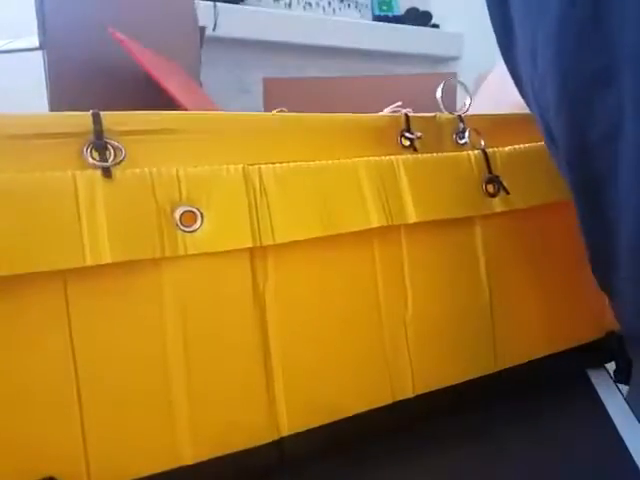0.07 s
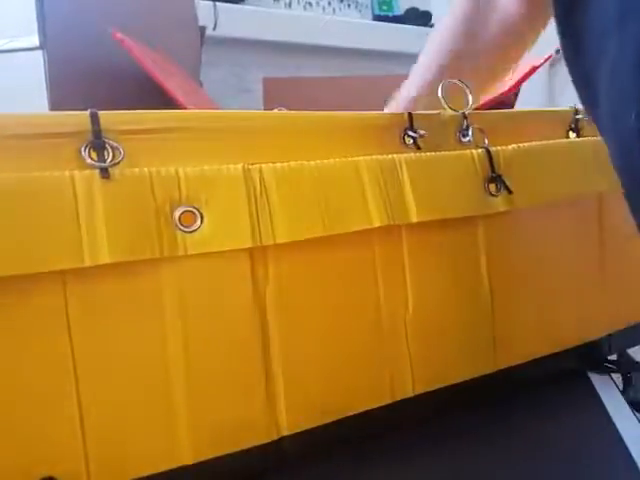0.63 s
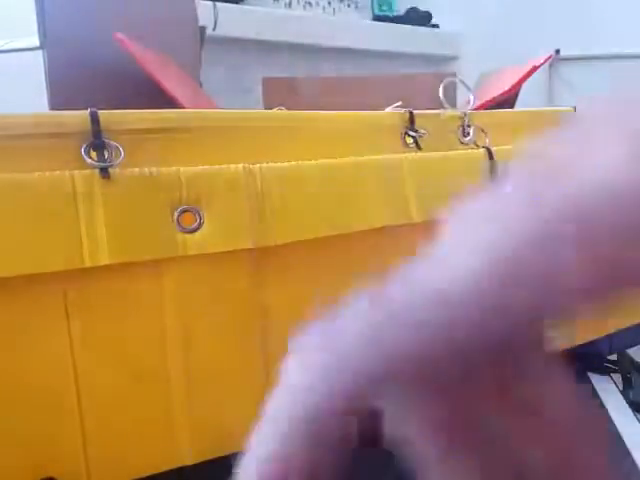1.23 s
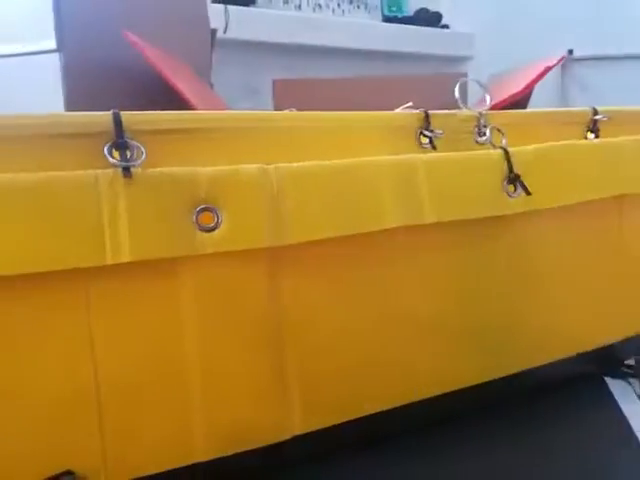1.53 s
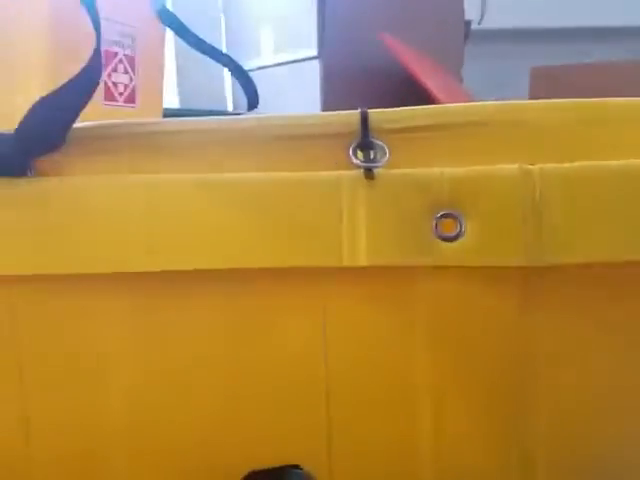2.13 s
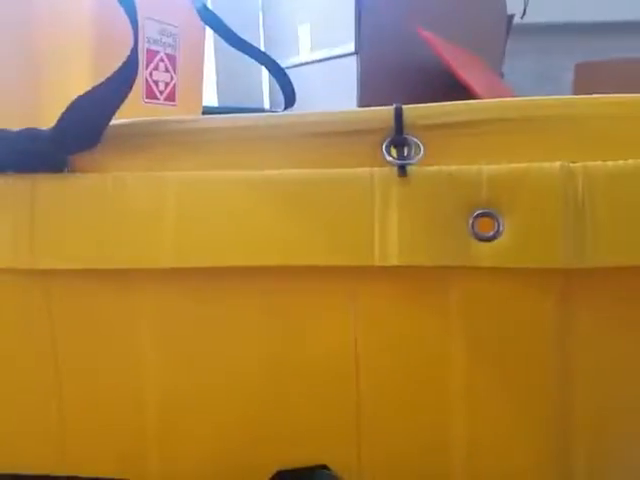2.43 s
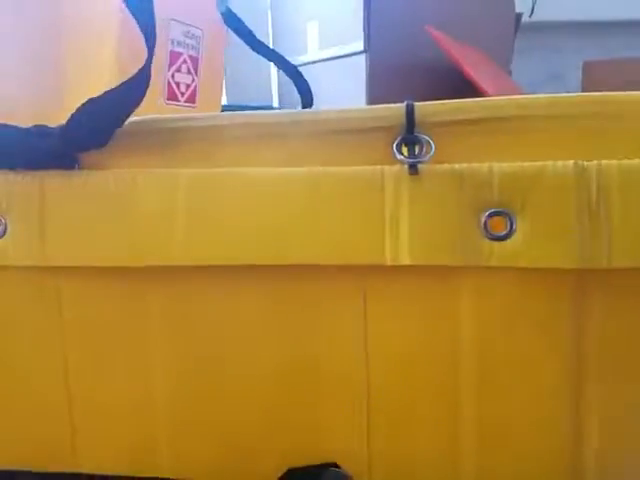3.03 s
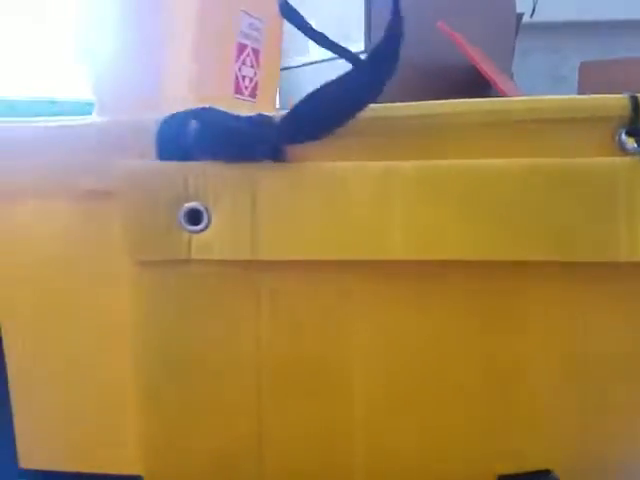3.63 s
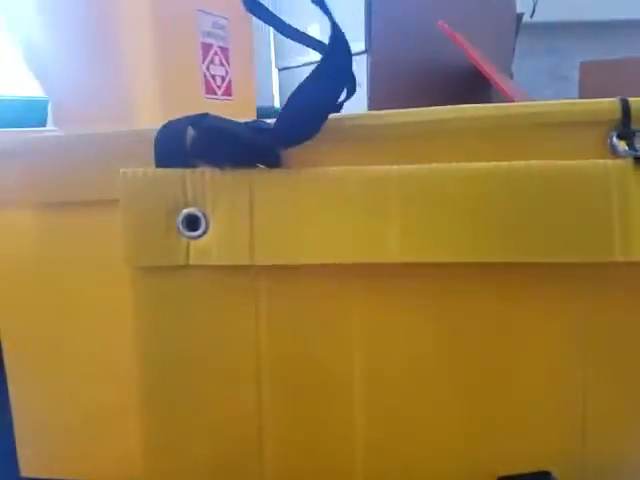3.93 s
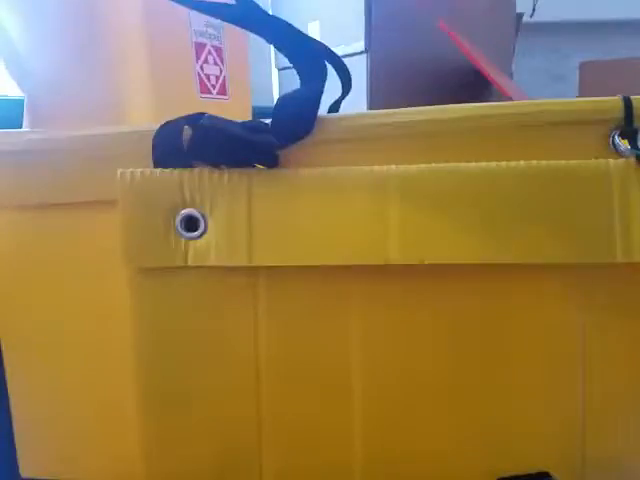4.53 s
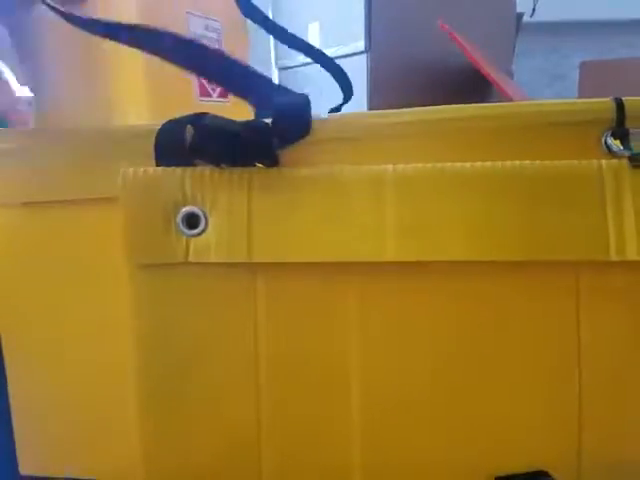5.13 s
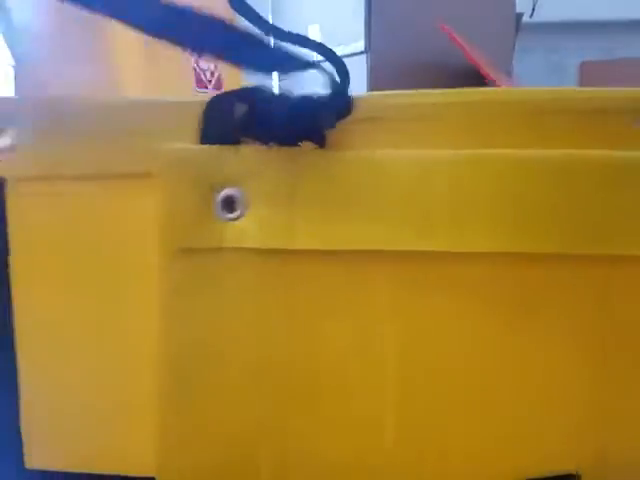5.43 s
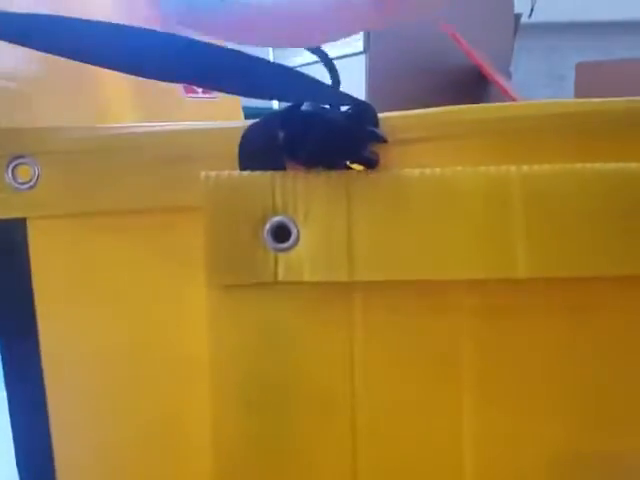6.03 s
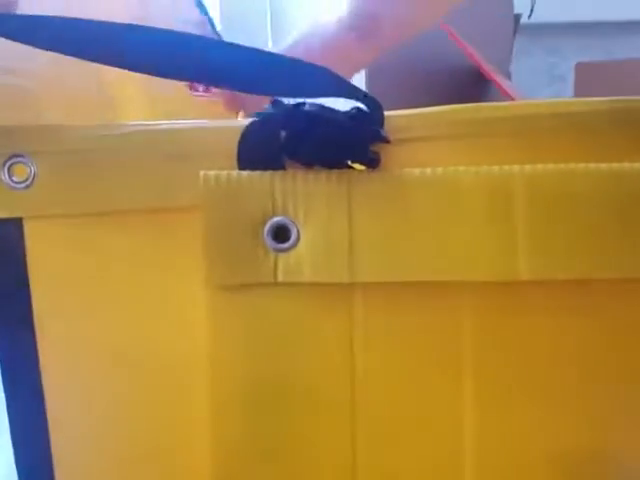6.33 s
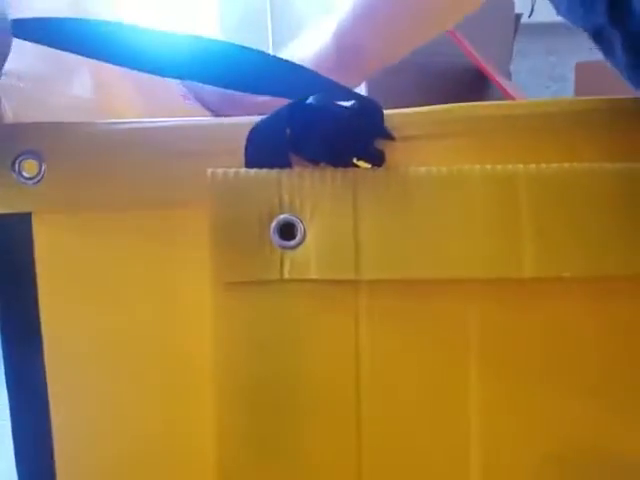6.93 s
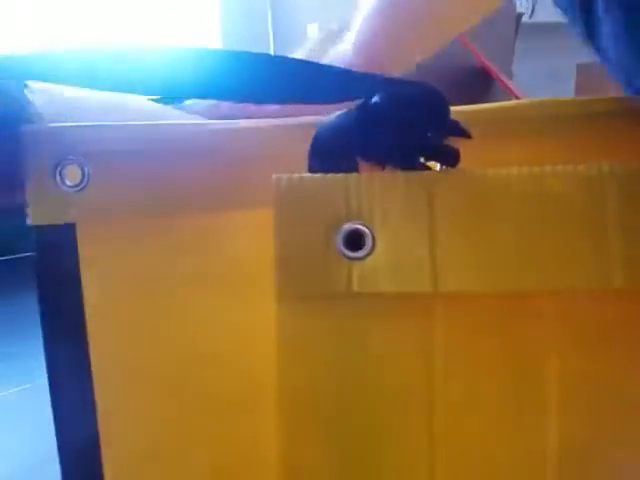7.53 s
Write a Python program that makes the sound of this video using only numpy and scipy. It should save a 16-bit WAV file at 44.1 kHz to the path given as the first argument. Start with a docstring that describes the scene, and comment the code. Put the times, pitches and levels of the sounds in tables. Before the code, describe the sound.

For the first second, a sleeve softly crinkles and scrapes against a folded plastic kayak hull, with a light hollow knock over low handling rumble. Rings and a buckle click around 1 second. From 1.5 to 2.4 seconds the microphone is shifted on its stand: dull bumps, rumble and a brief low groan. At 3 seconds comes a cluster of knocks and a sharp click, then a nylon strap rasps along the hull until about 3.7. Light clicks and taps follow from 4.3. Between 5 and 6 seconds the webbing catches and slips in uneven pulls, with buckle clicks and hollow panel knocks. Two hard knocks land at 6.7 and 6.8 seconds, the second the loudest. A strong short tug with clattering clicks follows at 7.3, then a softer rasp to the end. The sounds are close, with a bare room's light echo.

```python
"""Hollow knocks, clicks and rasping strokes in a bare room: a nylon strap is threaded through a buckle
and pulled along a kayak's folded plastic hull. Blows ring the panels, buckle and rings strike each
other, the webbing catches and slips, a sleeve scrapes and crinkles. Early on the microphone is
gripped and shifted on its stand, which bumps and groans."""
import sys
import numpy as np
from scipy import signal
from scipy.fft import rfft, irfft, next_fast_len
from scipy.io import wavfile
from scipy.ndimage import uniform_filter1d

SR = 44100
rng = np.random.default_rng(int(sys.argv[2]) if len(sys.argv) > 2 else 0)


def wrap_up_sound(samples):
    """Save the sound to the file named by the first command line argument, as 16-bit audio."""
    columns = np.atleast_2d(samples).T
    # keep every value between -1 and 1, then stretch to whole-number steps
    tamed = np.clip(columns, -1, 1)
    steps = np.round(tamed * 32767).astype(np.int16)
    wavfile.write(sys.argv[1], SR, steps)


N = 343362
TIME = np.arange(N) / SR

# strap pulls: (start [s], end [s], rasp [dB], hiss boost and drum cut [dB], unevenness [dB])
PULLS = [(0.0, 0.102, -65.5, -2, 3.8), (0.154, 0.299, -73, 12.5, 1.3), (0.662, 0.872, -64, -0.5, 1.8),
         (3.047, 3.092, -43.5, 0, 2.3), (3.16, 3.396, -51.5, 2.5, 1.1), (3.233, 3.651, -44, -1.5, 0.72),
         (4.24, 4.336, -70, -4.5, 4.2), (4.343, 4.48, -66, -8, 2.4), (4.821, 4.966, -54.5, 3, 3.3),
         (5.123, 5.344, -56, -2, 1.6), (5.37, 5.736, -45.5, -2, 1.8), (5.819, 6.021, -47.5, 1, 2.4),
         (6.134, 6.393, -61, -3, 1.7), (6.454, 6.67, -58, -3, 2.7), (6.691, 6.772, -51.5, -4, 2.1),
         (6.803, 6.895, -42.5, -9.5, 3.3), (7.14, 7.22, -53.5, 0.5, 2.5), (7.292, 7.409, -37.5, -1, 2.4),
         (7.616, 7.894, -54, -1, 2.7)]
# rumble spectrum of hull and stand: (frequency [Hz], level [dB])
RUMBLE_SPECTRUM = [(20, -6), (45, -1), (90, -1), (200, -3), (300, -8), (500, -27.5), (1000, -27),
                   (3000, -77)]


def knocks(rise_cycles=1.44, min_cycles=0.67, medium_db=-38.5, hardening=0.35):
    """Hollow blows on the plastic panels; harder blows have shorter contact."""
    # blows: (time [s], level [dB], panel pitch [Hz], clatter [dB])
    hits = [(0.477, -39.5, 202, -5), (0.492, -52.5, 294.2, 5), (2.943, -33, 291, -3),
            (2.966, -45, 292, 10.5), (3.018, -36.5, 310, 6), (3.0289, -16, 1186, -3.5),
            (4.412, -38.5, 113, -6), (4.445, -53, 95, -5.5), (4.81, -36.5, 180, -1),
            (5.159, -32.5, 400, -6), (5.399, -42.5, 105, -7), (5.59, -27, 85, -4.5),
            (5.611, -31.5, 293, -4.5), (5.642, -41, 104.1, -7), (5.729, -41.5, 327, -7),
            (5.831, -36, 342, -4), (5.847, -26.5, 343, -6.5), (6.603, -42, 297, -1.5),
            (6.6938, -17.5, 360, -10.5), (6.699, -23, 500, -1.5), (6.8041, -7.5, 890, -6.5),
            (6.808, -14.5, 489, -12.5), (7.298, -30, 370, -1), (7.300, -29, 112.4, -7.5),
            (7.321, -35, 52.4, -7), (7.39, -35.5, 375, -4)]
    # room send, higher for later knocks: (time [s], level [dB])
    room_send = [(3.0, -13), (6.7, -7.5)]
    direct, sent = np.zeros((2, 2, N))
    for s, db, hz, clatter_db in hits:
        rise_s = max(rise_cycles * from_db(hardening * (medium_db - db)), min_cycles) / hz
        knock = from_db(db) * blow(hz, rise_s, clatter_db, below_db=7, above_db=-8.5, lag_s=8e-5)
        knock = cut(knock, 0.35 * hz, "high")  # small panels radiate little bass
        knock = cut(knock, 1500, "low", order=4)  # soft plastic absorbs treble
        add(direct, s, knock)
        add(sent, s, knock * from_db(np.interp(s, *np.transpose(room_send))))
    return hull(direct + room(sent))


def blow(hz, rise_s, clatter_db, below_db, above_db, lag_s, size=8192):
    """Damped main mode in a noisy cluster of others; lag_s delays the left channel."""
    t = np.arange(size) / SR - np.array([[lag_s], [0]])
    skirts = [(hz / 24, below_db - 40), (hz / 2.5, below_db), (hz, 0), (hz * 1.4, 0),
              (hz * 11, 3 * above_db), (hz * 180, 9 * above_db)]
    cluster = from_db(clatter_db) * noise(skirts, size)
    # stiffest when bent most, so the pitch sags
    lead_s = 0.25 * rise_s * (1 - np.exp(-np.maximum(t, 0) / (2 * rise_s)))
    return swell(t, rise_s) * (np.sin(2 * np.pi * hz * (t + lead_s)) + cluster)


def hull(contact):
    """Any contact rings the hull's panels."""
    # panel modes: (frequency [Hz], width [Hz], gain [dB])
    panel_modes = [(307, 130, -2), (500, 130, -11), (754, 90, -18), (1210, 90, -15)]
    return resonate(contact, panel_modes)


def clicks(rise_cycles=1.09, mode_spread_db=3, snap_s=0.0018, size=8192):
    """Buckle and rings meet: a short rattle rings the modes unevenly, under a bright snap."""
    # contacts: (time [s], level [dB], pitch [Hz], snap [dB], room send [dB])
    hits = [(0.9887, -40, 2750, -1, -12), (0.9917, -46, 4700, -8.5, -17), (1.0471, -40.5, 2250, 2, -14),
            (1.054, -36, 4600, -1, -11.5), (1.226, -50.5, 990, -1, -17), (1.470, -39.5, 1200, 6, -15),
            (1.4768, -39, 1070, -8, -17), (1.488, -44, 820, -13, -14), (2.254, -50.5, 910, -22, -2),
            (2.942, -48.5, 1020, 14.5, -1), (2.955, -41, 2800, 10, -2), (3.0032, -38.5, 1910, 6, -5.5),
            (3.0285, -25.5, 3040, 7.5, -14), (3.248, -40, 1510, -2, -7), (4.299, -44.5, 1160, -15.5, -8),
            (4.3467, -32.5, 1390, 2, -10.5), (4.408, -45.5, 1210, 3, -3.5), (4.668, -60.5, 2950, 21, -7),
            (4.811, -41.5, 1020, -2.5, -9.5), (5.0596, -30, 2240, -3, -13.5), (5.157, -27.5, 1870, 0.5, -8),
            (5.396, -48, 1200, 12.5, -3), (5.5922, -27.5, 1340, -17, -11), (5.641, -41, 2550, 8, -3),
            (5.85, -31.5, 1770, -2, -5), (6.152, -42.5, 1528, 11.5, -2.5), (6.471, -41, 1240, 2, -16),
            (6.526, -41, 1390, 7, -27), (6.566, -38, 4700, -14, -6), (6.570, -51, 4700, -18, -6),
            (6.693, -25.5, 1520, -11.5, -9.5), (6.8023, -28, 1370, 1.5, 2), (7.309, -35, 1500, 6, -5.5),
            (7.335, -34.5, 2170, -20.5, -9.5), (7.358, -34, 1510, 0.5, -6), (7.379, -39, 1370, 0, -8),
            (7.394, -38.5, 1330, 14.5, -4.5), (7.474, -37.5, 1050, 11.5, -16),
            (7.5214, -48.5, 893, 18, -21)]
    # buckle modes: (frequency [Hz], width [Hz], gain [dB])
    buckle_modes = [(1700, 160, -2), (2190, 174, 4.5), (2750, 90, 1), (3310, 87, 5), (4640, 450, 4)]
    # snap spectrum: (frequency [Hz], level [dB])
    snap_spectrum = [(1000, 6.5), (3000, 0), (5000, -10), (7500, -12), (11000, -0.5), (16000, -0.5)]
    direct, sent = np.zeros((2, 2, N))
    t = np.arange(size) / SR
    crack = cut((t == 0) + 1e-18, 2430, "high") * np.sqrt(2 * snap_s * SR)
    front = from_db(-13) * cut(crack, 8700, "high")
    for s, db, hz, snap_db, room_db in hits:
        modes = [(mode_hz, width_hz, mode_db + mode_spread_db * rng.standard_normal())
                 for mode_hz, width_hz, mode_db in buckle_modes]
        rattle = blow(hz, rise_cycles / hz, clatter_db=2, below_db=4.5, above_db=-9.5, lag_s=5e-5)
        ring = from_db(db - 6.5) * resonate(rattle, modes)
        snap = swell(t, snap_s) * noise(snap_spectrum, size) + front
        snap_gain = from_db(db + snap_db - 10)
        add(direct, s, ring + snap_gain * snap)
        add(sent, s, from_db(room_db) * (ring + from_db(-4) * snap_gain * crack))
    return direct + room(sent)


def strap(snag_per_db=0.1954, taut_from_s=3.7, flex_ease_s=0.038):
    """Webbing rasps and drums on the hull, its fibres hiss; once taut, it also flexes the hull."""
    # slack strap and sleeves stirring: (time [s], level [dB])
    stir = [(0, -57), (1.4, -70.5), (2.2, -68), (2.5, -74), (4.1, -69), (6.0, -58.5), (6.45, -68.5),
            (7.79, -52)]
    # friction spectra: (frequency [Hz], level [dB])
    rasp_spectrum = [(300, -17), (700, 1), (1100, 6.5), (2000, 1), (3000, -4.5), (4200, -11), (5500, -13),
                     (8000, -55), (16000, -46)]
    drum_spectrum = [(35, -20), (105, -2.5), (200, -8), (380, -3.5), (900, -8), (1500, -22), (4000, -64)]
    hiss_spectrum = [(1200, -7.5), (2700, 3.5), (5000, -6), (8000, -9), (11000, -1.5), (16000, -2.5)]
    pull = pull_gains()
    rasp_gain, drum_gain, hiss_gain = pull + envelope(stir) * from_db([[0], [4], [-13]])
    start_s, end_s, _, _, pull_uneven_db = np.transpose(PULLS)
    uneven_db = np.interp(TIME, (start_s + end_s) / 2, pull_uneven_db)
    slide = friction(rasp_spectrum, catches_per_s=3800, spread_db=5, smooth_db=4)
    snags = friction(rasp_spectrum, catches_per_s=320, spread_db=4, smooth_db=-24)
    rasp = wandering_contact(slide + snag_per_db * uneven_db * snags, per_s=28, depth_db=4.5)
    drum = unit_rms(hull(friction(drum_spectrum, catches_per_s=650, spread_db=2.5, smooth_db=1)))
    rub = from_db(-1) * rasp_gain * rasp + drum_gain * drum
    rub *= flutter(per_s=77, depth_db=uneven_db)  # uneven pressure
    hiss = hiss_gain * friction(hiss_spectrum, catches_per_s=9000, spread_db=10.5, smooth_db=7)
    flex = ease(pull[0] * (TIME > taut_from_s), flex_ease_s) * noise(RUMBLE_SPECTRUM)
    return from_db(-5) * rub + from_db(-11.5) * room(rub) + from_db(10.5) * hiss + from_db(-2.5) * flex


def pull_gains(medium_db=-49, hiss_slope=0.769, taper_per_s=1.64, ease_s=0.047):
    """Rasp, drum and hiss gains: each pull speeds up and slows in one arc."""
    gains = np.zeros((3, N))
    for start_s, end_s, db, bright_db, _ in PULLS:
        length_s = end_s - start_s
        arc = np.abs(np.sin(np.linspace(0, np.pi, int(length_s * SR)))) ** (taper_per_s * length_s)
        drum_db = db - 0.5 - bright_db
        hiss_db = -63.5 + hiss_slope * (db - medium_db) + bright_db
        add(gains, start_s, from_db([[db], [drum_db], [hiss_db]]) * arc)
    return ease(gains, ease_s)


def friction(spectrum, catches_per_s, spread_db, smooth_db):
    """The weave catches and slips: uneven ticks over a smooth rub."""
    sizes = from_db(spread_db * np.minimum(rng.exponential(1, N), 4))
    caught = rng.random(N) < catches_per_s / SR
    ticks = unit_rms(caught * sizes * rng.standard_normal((2, N)))
    return diffuse(ticks + from_db(smooth_db) * rng.standard_normal((2, N)), spectrum)


def wandering_contact(x, per_s, depth_db, bands=16):
    """The contact patch wanders over the weave, so each band swells and fades alone."""
    size = next_fast_len(N, True)
    spectrum, hz = rfft(x, size), bins_hz(size)
    centres_hz, out = np.geomspace(700, 15000, bands), 0
    for share in np.eye(bands):
        band = irfft(spectrum * np.interp(hz, centres_hz, share), size)[:, :N]
        out = out + band * flutter(per_s, depth_db)
    return out * np.std(x) / np.std(out)


def stand(rise_cycles=1.67, top_hz=1700):
    """Handling rumble, groan and bumps reach the microphone through its stand: dull, no room."""
    # grip rumble: (time [s], level [dB])
    grip = [(0, -41.5), (0.35, -53), (1.42, -59.5), (1.5, -37), (1.68, -53.5), (1.88, -44), (2.33, -51.5),
            (2.46, -67.5)]
    # bumps: (time [s], level [dB], pitch [Hz], left minus right [dB])
    bumps = [(0.779, -45.5, 85.9, 0), (1.456, -36.5, 77.6, -18), (1.464, -41, 251, -5),
             (1.485, -31, 317, -8), (1.91, -32, 182, -14.5), (1.958, -33.5, 182, 7),
             (2.122, -31.5, 181, 1.5), (2.149, -45.5, 374, -14), (2.241, -22.5, 171.5, -3),
             (2.249, -35, 356, -14.5), (2.328, -40.5, 263, -5), (2.961, -38, 72.4, -1)]
    out = envelope(grip) * noise(RUMBLE_SPECTRUM) * flutter(per_s=31, depth_db=3) + groan()
    for s, db, hz, pan_db in bumps:
        bump = blow(hz, rise_cycles / hz, clatter_db=-7.5, below_db=-14.5, above_db=-19, lag_s=-0.00182)
        add(out, s, bump * from_db([[db + pan_db / 2], [db - pan_db / 2]]))
    return cut(out, top_hz, "low")


def groan(start_s=1.84, end_s=2.306, pitch_hz=202):
    """The stand's foot sticks and slips at an unsteady rate, in spurts."""
    phase = 2 * np.pi * np.cumsum(pitch_hz * flutter(per_s=99, depth_db=0.8078)) / SR
    octave = from_db(-19) * np.sin(2 * phase) * flutter(per_s=25, depth_db=8.5)
    progress = np.clip((TIME - start_s) / (end_s - start_s), 0, 1)
    spurts = np.sqrt(np.abs(np.sin(np.pi * progress))) * flutter(per_s=69, depth_db=3.5)
    return from_db([[-47], [-43]]) * spurts * (np.sin(phase) + octave)


def cloth(crease_rise_s=0.0016, room_db=-7):
    """Fabric scrapes over the hull's edge; each crease releases a burst of tiny snaps."""
    # creases: (time [s], level [dB])
    creases = [(0.076, -48), (0.111, -46), (0.254, -39), (0.403, -52), (0.598, -52.5), (0.612, -60),
               (0.682, -43.5), (0.727, -53), (0.835, -50), (5.595, -38), (7.297, -29.5)]
    # scrapes: (start [s], end [s], level [dB])
    scrapes = [(0.133, 0.32, -58.5), (3.32, 3.593, -52.5), (5.43, 5.518, -51), (6.688, 6.797, -50)]
    # fabric spectra: (frequency [Hz], level [dB])
    crinkle_spectrum = [(300, 3), (900, 0.5), (2700, -7), (4000, -12.5), (8000, -22), (16000, -19)]
    scrape_spectrum = [(1400, -13), (1950, -4.5), (2500, -5), (3250, -3), (3600, -15), (4100, -11.5),
                       (8500, -26)]
    bursts, pressure = np.zeros((2, 1, N))
    for s, db in creases:
        add(bursts, s, from_db(db) * swell(np.arange(4096)[None] / SR, crease_rise_s))
    for start_s, end_s, db in scrapes:
        window = signal.windows.tukey(int((end_s - start_s) * SR), 0.5)
        add(pressure, start_s, from_db(db) * window[None])
    out = bursts * friction(crinkle_spectrum, catches_per_s=2500, spread_db=4, smooth_db=-8)
    out += pressure * friction(scrape_spectrum, catches_per_s=710, spread_db=2, smooth_db=-4)
    return out + from_db(room_db) * room(out)


def sleeve_whistle(level_db=-76):
    """Fabric flicks past; its weave whistles faintly, falling as it slows."""
    # glide: (time [s], pitch [Hz])
    glide = [(1.16, 14100), (1.245, 15600), (1.29, 14300), (1.345, 11600)]
    s, hz = np.transpose(glide)
    pitch_hz = np.interp(TIME, s, hz) * flutter(per_s=400, depth_db=-1.5)
    tone = np.sin(2 * np.pi * np.cumsum(pitch_hz) / SR)
    gain = np.interp(TIME, s, [0, 1, 1, 0]) * flutter(per_s=200, depth_db=10)
    return from_db(level_db) * gain * tone


def room(x, near_s=0.0032, wall_s=0.0272, smear_s=0.001, build_s=0.0054, size=40000):
    """Hull and floor reflections, a wall slap, then a diffuse tail, shortest in the top treble."""
    # tail decay: (frequency [Hz], T60 [s])
    t60 = [(100, 3), (400, 0.76), (1000, 0.96), (3000, 1.14), (6000, 0.8043), (15000, 0.01)]
    # tail spectrum: (frequency [Hz], level [dB])
    tail_spectrum = [(50, -12), (130, -9.5), (250, -4), (700, 1), (1000, -5.5), (1500, -0.5), (2400, -3),
                     (5000, -2.5), (9000, -5.5), (16000, 28)]
    t, hz = np.arange(size) / SR, bins_hz(size)
    field = rfft(noise([(20, 0), (20000, 0)], size)) * from_db(at_hz(tail_spectrum, hz))
    centres_hz, tail = np.geomspace(60, 15000, 9), 0
    for centre_hz, share in zip(centres_hz, np.eye(len(centres_hz))):
        band = irfft(field * at_hz(list(zip(centres_hz, share)), hz), size)
        tail = tail + band * from_db(-60 * t / at_hz(t60, centre_hz))
    tail *= from_db(-31) * (1 - np.exp(-t / build_s))
    near = from_db(-0.5) * swell(t, near_s) / np.sqrt(near_s * SR)
    wall = from_db(-10.5) * swell(t - wall_s, smear_s) / np.sqrt(smear_s * SR)
    echoes = (near + wall) * noise([(3000, 0.5), (16000, -5.5)], size)
    return signal.fftconvolve(x, tail + echoes, axes=1)[:, :N]


def background(level_db=-65.5):
    """Faint steady noise, mostly low."""
    # noise floor: (frequency [Hz], level [dB])
    floor_spectrum = [(15, -46), (25, -4), (70, -7), (263, 1.5), (400, -17.5), (700, -9), (1160, -16.5),
                      (2110, -11.5), (2410, -19), (4370, -25), (9570, -29.5), (14400, -20), (16000, -21.5)]
    return from_db(level_db) * noise(floor_spectrum)


def diffuse(pair, spectrum):
    """Two unrelated signals to a coloured stereo field, alike in the bass; rms 1."""
    # left-right coherence: (frequency [Hz], correlation [-1 to 1])
    coherence = [(130, 0.9), (290, 0.926), (640, 0.453), (1400, -0.18), (3000, -0.035)]
    size = next_fast_len(pair.shape[1], True)
    hz = bins_hz(size)
    mid, side = rfft(pair, size)
    alike = at_hz(coherence, hz)
    stereo = np.sqrt(1 + alike) * mid + np.sqrt(1 - alike) * side * [[1], [-1]]
    return unit_rms(irfft(stereo * from_db(at_hz(spectrum, hz)), size)[:, :pair.shape[1]])


def noise(spectrum, size=N):
    return diffuse(rng.standard_normal((2, size)), spectrum)


def resonate(x, modes):
    """A contact plus the two-pole resonances of the touched part."""
    out = x.copy()
    for hz, width_hz, db in modes:
        r = np.exp(-np.pi * width_hz / SR)
        b = np.array([1, 0, -1]) * (1 - r * r) / 2
        a = [1, -2 * r * np.cos(2 * np.pi * hz / SR), r * r]
        out += from_db(db) * signal.lfilter(b, a, x + 1e-18)
    return out


def flutter(per_s, depth_db):
    """Randomly wandering gain."""
    return from_db(depth_db * np.interp(TIME * per_s, np.arange(4000), rng.standard_normal(4000)))


def swell(t, rise_s):
    """Reaches 1 at rise_s, then decays."""
    u = np.maximum(t, 0) / rise_s
    return u * np.exp(1 - u)


def envelope(points, fade_s=0.04):
    """Gain from (time [s], level [dB]) points, faded beyond the ends."""
    s, db = np.transpose(points)
    fade = np.interp(TIME, [s[0] - fade_s, s[0], s[-1], s[-1] + fade_s], [0, 1, 1, 0])
    return fade * from_db(np.interp(TIME, s, db))


def ease(gain, window_s):
    return np.abs(uniform_filter1d(gain, int(window_s * SR)))


def at_hz(points, hz):
    """Interpolate on a log-frequency axis."""
    points_hz, values = np.transpose(points)
    return np.interp(np.log(np.maximum(hz, 1)), np.log(points_hz), values)


def bins_hz(size):
    return np.arange(size // 2 + 1) * SR / size


def cut(x, hz, kind, order=2):
    return signal.sosfilt(signal.butter(order, hz, kind, fs=SR, output="sos"), x)


def add(track, start_s, sound):
    i = round(start_s * SR)
    track[:, i:i + sound.shape[1]] += sound[:, :N - i]


def from_db(db):
    return 10 ** (np.asarray(db) / 20)


def unit_rms(x):
    return x / np.sqrt(np.mean(x ** 2) + 1e-20)


def scene():
    """All sources, duller on the left, over the noise floor."""
    # left microphone port: (frequency [Hz], gain [dB])
    left_port = [(4500, 0.5), (6500, -1), (8500, -24), (11000, -12.5), (15000, -11.5)]
    left, right = knocks() + clicks() + strap() + cloth() + sleeve_whistle() + stand()
    hz = bins_hz(256)
    taps = signal.firwin2(65, hz, from_db(at_hz(left_port, hz)), fs=SR)
    return np.array([np.convolve(left, taps, "same"), right]) + background()


def record(dry, low_hz=24, top_hz=16000):
    """Drops the deepest bass and cuts the top steeply."""
    taps = signal.firwin(301, top_hz, window="blackman", fs=SR)
    return signal.fftconvolve(cut(dry, low_hz, "high"), taps[None], "same", axes=1)


dry = scene()
out = record(dry)
wrap_up_sound(out)
```